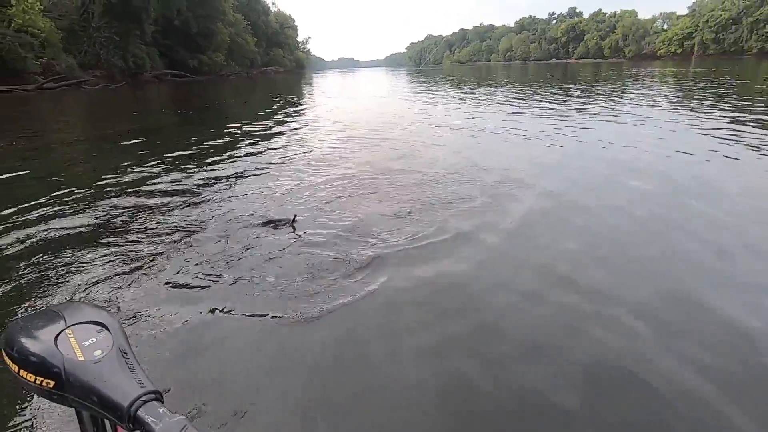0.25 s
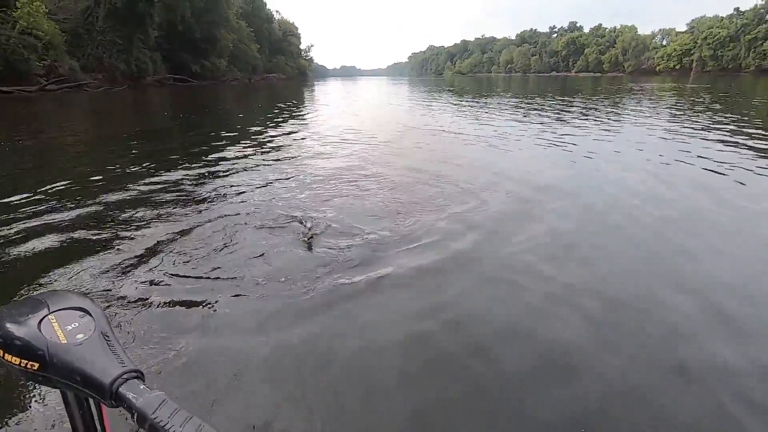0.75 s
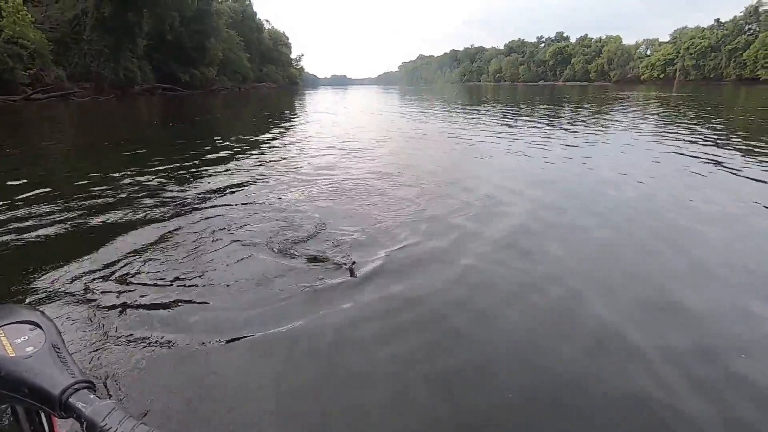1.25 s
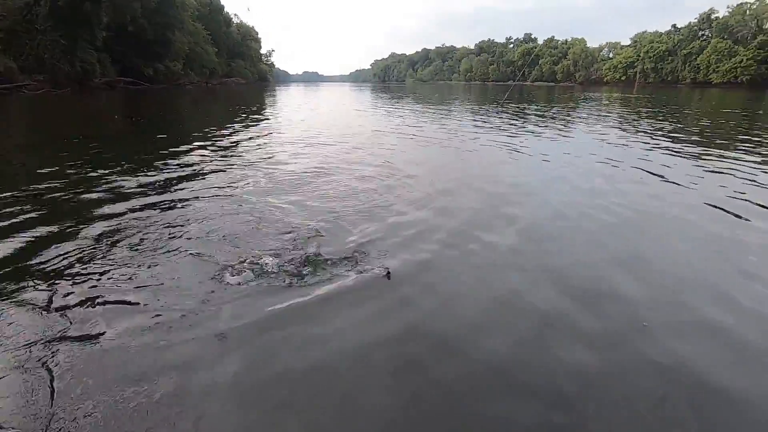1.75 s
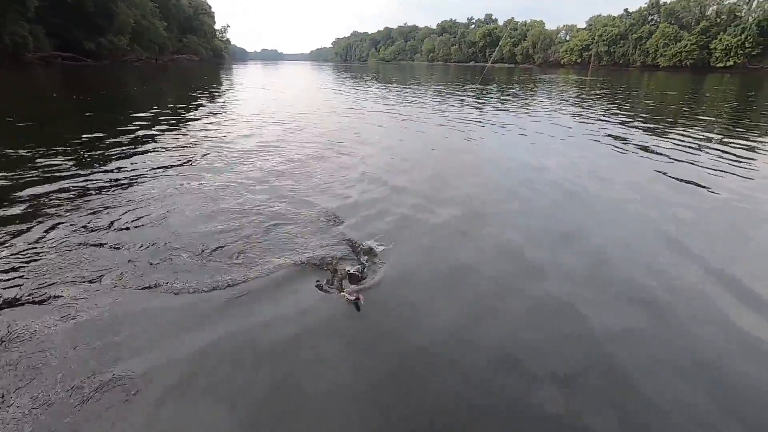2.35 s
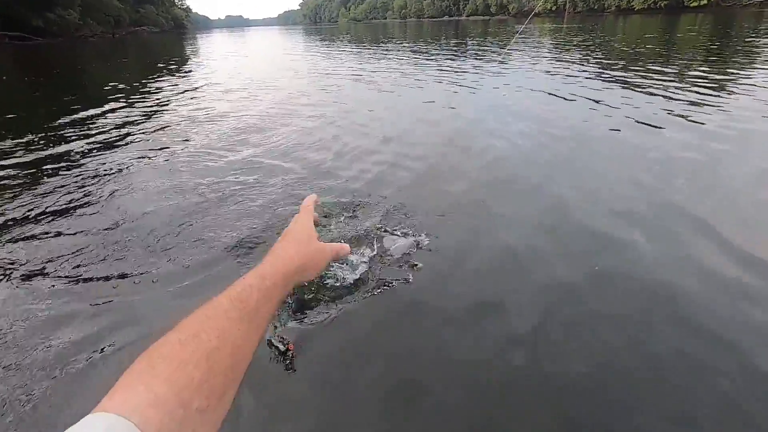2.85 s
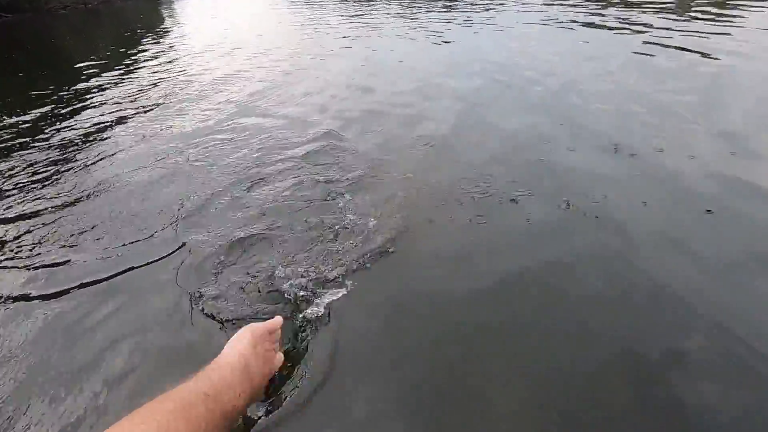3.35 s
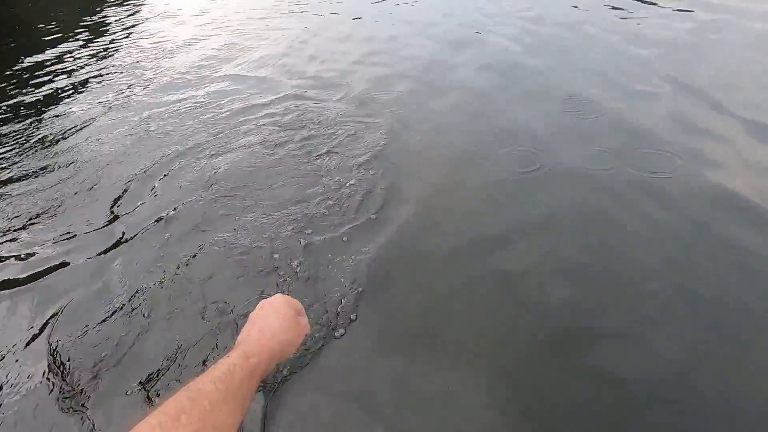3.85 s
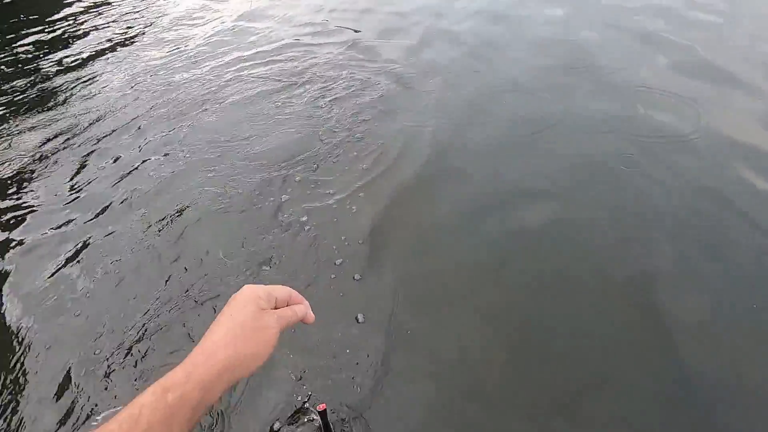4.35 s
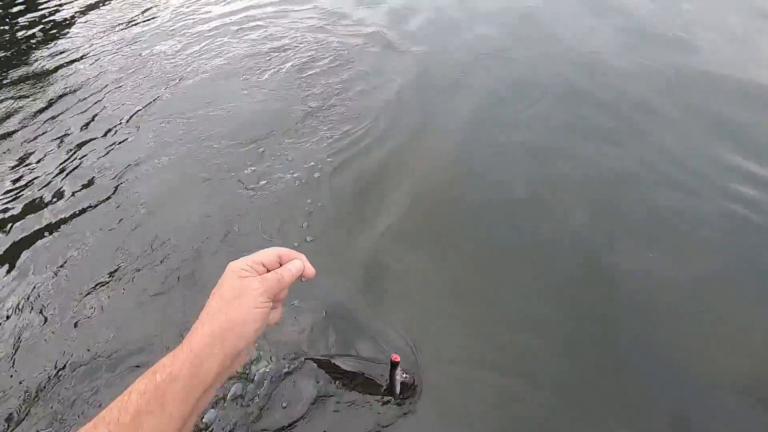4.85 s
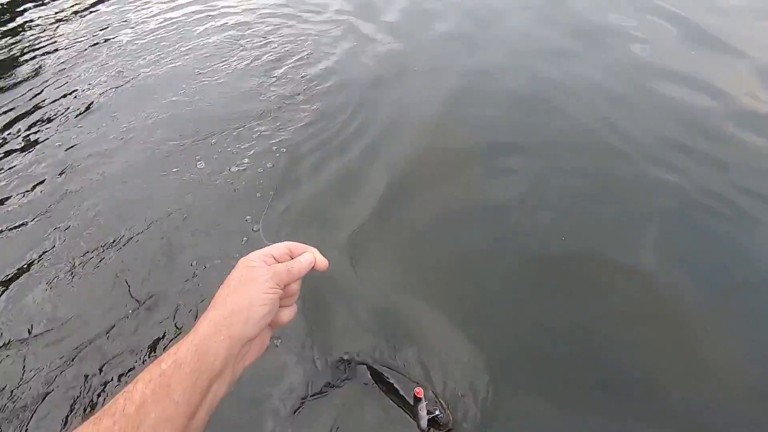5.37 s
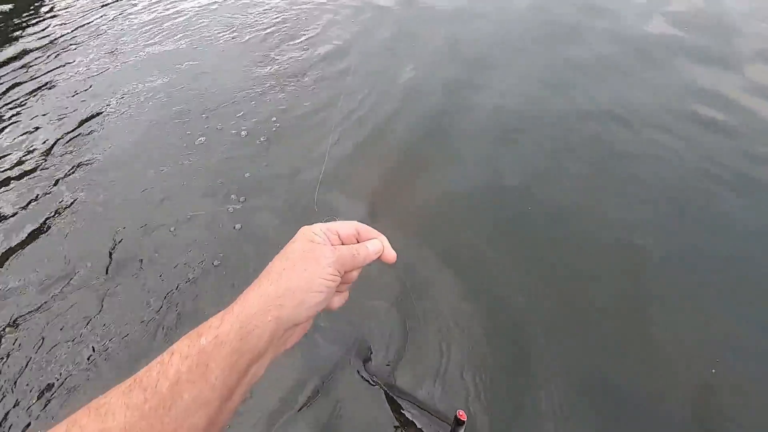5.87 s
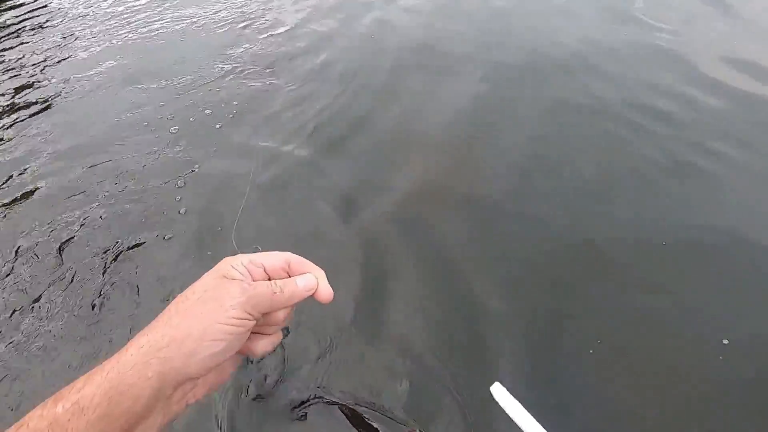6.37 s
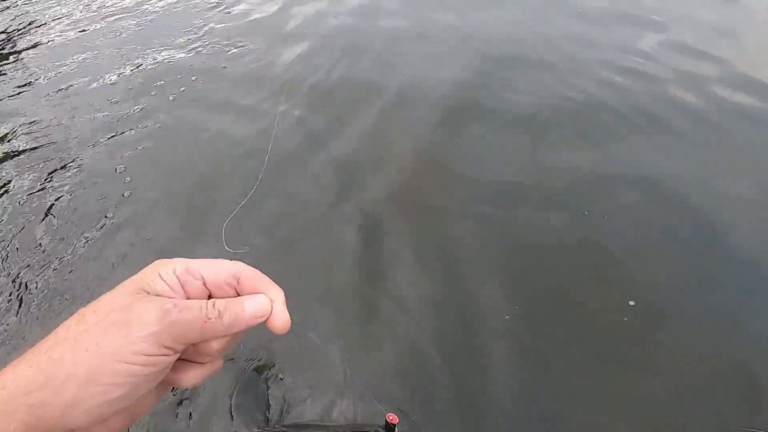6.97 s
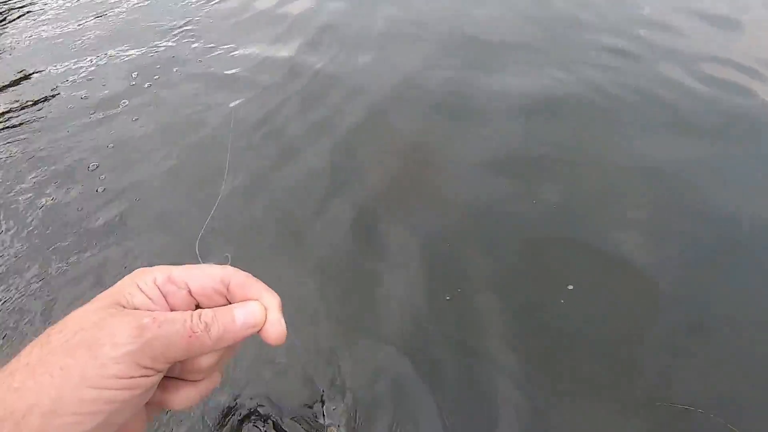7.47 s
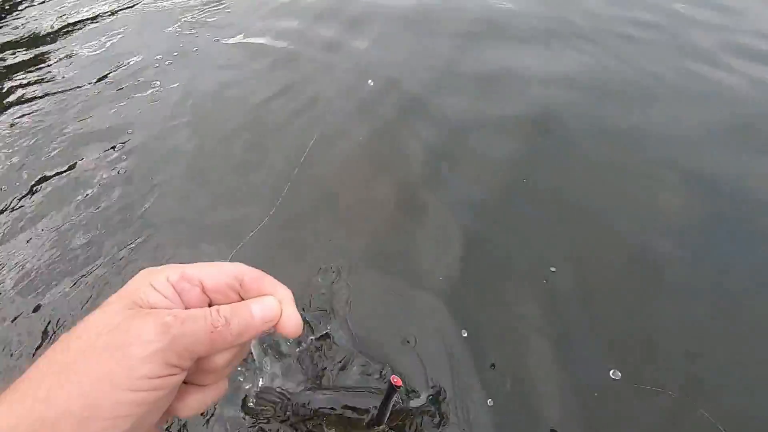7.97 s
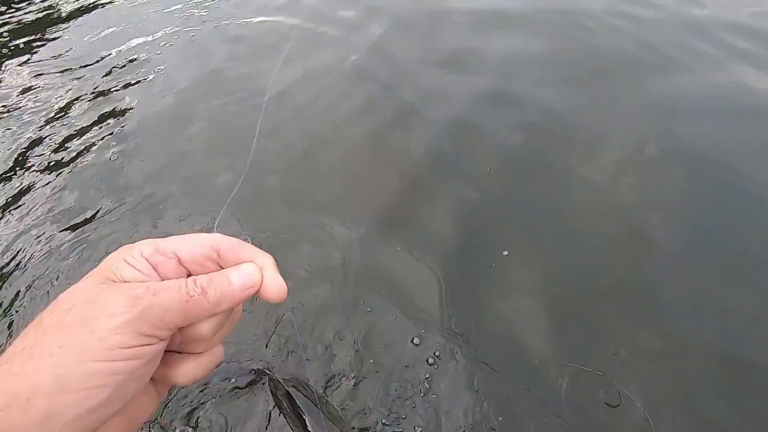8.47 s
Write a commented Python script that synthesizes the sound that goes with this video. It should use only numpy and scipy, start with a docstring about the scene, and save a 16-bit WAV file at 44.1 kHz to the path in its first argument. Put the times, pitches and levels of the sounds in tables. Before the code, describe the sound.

Close to a small boat on a wide open river, a hooked fish splashes in fits: light drips at first, then busy gurgling and slaps, a short sharp flurry, and several hollow knocks on the hull. After a quieter spell with a tiny bird whistle, the hardest thrash cracks out and settles in drips. A dull low machine drone throbs throughout, picked up by a small stereo camera microphone.

```python
"""Far machinery drones over a wide river throughout: steady sines beat inside a dull roar of shaped noise.
From the start a hooked fish thrashes beside a small boat; spray, bubbles and drops are decaying sines
and noise ticks, busy from 2.2 to 3.6 s and again from 4.3 to 4.8 s. From 5.4 s a tool knocks on the hull,
which rings in damped modes; at 6.7 s a bird gives one falling whistle, a gliding sine; from 7.5 s the fish
thrashes hardest, then the water settles. A small camera with two microphone ports listens."""
import sys
import numpy as np
from scipy import signal
from scipy.fft import rfft, irfft, next_fast_len
from scipy.io import wavfile
from scipy.ndimage import uniform_filter1d

SR = 44100
rng = np.random.default_rng(int(sys.argv[2]) if len(sys.argv) > 2 else 0)


def volts_from_decibels(level):
    """Turn decibel levels (scalar or array-like) into linear amplitude factors."""
    exponent = np.asarray(level, float) / 20
    return 10 ** exponent


def generate_wav(sig):
    """Save sig (samples, or channels by samples) to the path in sys.argv[1] as 16-bit PCM at SR."""
    pcm = np.round(np.clip(np.atleast_2d(sig).T, -1, 1) * 32767).astype(np.int16)
    wavfile.write(sys.argv[1], SR, pcm)


N = 384552
T = np.arange(N) / SR

# Steady tones of the far machinery. Each row: frequency in Hz, rms level in dB before the level curves.
MACHINE_TONES = [(29.98, -54.7), (37.26, -34.3), (74.51, -33.7), (79.17, -43.9), (90.09, -30.2),
                 (95.89, -29.3), (114.02, -44.4), (117.1, -46.4), (143.1, -43.6), (149.0, -46.1),
                 (234.23, -50.1), (235.86, -50.2), (260.85, -52.9), (353.82, -53.6), (398.93, -52.2),
                 (468.46, -51.4), (471.76, -58.9), (820, -58.3)]
# Level curve for the 60 to 300 Hz tones, approximating slow beating. Each row: time in seconds, change in dB.
BASS_LEVEL = [(0, 0.5), (3.6, -0.5), (4.2, -5.5), (4.7, 2), (5.2, 1.5), (5.8, -1.5), (6.7, 3), (7.6, -1),
              (8.72, 2)]
# Broad roar under the tones. Each row: frequency in Hz, density in dB per Hz before balance and patches.
ROAR_SPECTRUM = [(20, -59.5), (36, -52), (50, -51), (100, -44), (150, -53.5), (212, -50.5), (300, -62.5),
                 (360, -60), (500, -68.5), (900, -74.5), (1700, -79), (2900, -87.5), (6200, -105),
                 (9100, -111), (16000, -125)]
# The camera turns, changing the upper part of the drone. Each row: time in seconds, change in the roar in dB.
CAMERA_FACING = [(0, 1), (1.5, 1), (2.5, 1.5), (3.8, 1), (4.8, 0), (5.4, 1.5), (5.9, -2.5), (6.6, 0.5),
                 (7.5, -2), (8.72, -0.5)]
# Correlation of the roar at the ports. Each row: frequency in Hz, likeness (1 same, -1 opposed; clipped there).
PORT_LIKENESS = [(60, 0.99), (120, 1), (260, 0.99), (530, 0.82), (1100, -0.12), (2290, 0.44), (4740, -0.29),
                 (9820, -1.1)]
# Balance of the roar. Each row: frequency in Hz, left minus right in dB.
PORT_BALANCE = [(60, 0.5), (140, -0.5), (330, 0), (770, -7), (1800, -8), (4200, -2.5), (9820, 3.5)]
# The bird's whistle. Each row: time in seconds, frequency in Hz, rms level in dB before panning.
BIRD_WHISTLE = [(6.69, 2690, -66), (6.71, 2640, -60), (6.735, 2470, -58), (6.752, 2320, -58),
                (6.77, 2200, -68)]
# Resonant modes of the hull. Each row: frequency in Hz, relative level in dB, 60 dB decay time in seconds.
HULL_MODES = [(103, -3.5, 0.09), (140, -6, 0.089), (167, -4.5, 0.14), (205.4, -4, 0.13), (291, -5, 0.1),
              (394, -6.5, 0.048), (543, -5.5, 0.02), (658, -8.5, 0.033), (845, -10.5, 0.031),
              (960, -12.5, 0.029), (1222, -6, 0.019), (1640, -14, 0.017), (2440, -11.5, 0.016),
              (2870, -19, 0.035), (3640, -14, 0.009), (4970, -22, 0.014), (6000, -20, 0.0072),
              (8140, -36, .01)]
# Blows on the hull. Each row: start in seconds, nominal level in dB, hardness in dB per octave,
# left minus right in dB, peak of the struck spot's snap in dB, snap frequency in Hz.
HULL_BLOWS = [(5.375, -36, 2.5, -15, -53, 800), (5.387, -20, 0.5, -12.5, -17.5, 270),
              (5.398, -36, -5, -7, -32, 480), (5.497, -40, 0, -5, -31, 1100),
              (5.513, -29, -0.5, -3, -19, 340), (5.528, -17.5, 0, -9.5, -29, 1050),
              (5.542, -28.5, -1, -7.5, -23, 420), (5.583, -10, 0.5, -5, -13, 743),
              (5.5924, -5.5, -2, -9, -17.5, 917), (6.004, -33.5, -2.5, -22, -39, 604),
              (6.149, -36.5, 8, -1.5, -32.5, 2700), (6.45, -24, 7, -4.5, -25.5, 1250)]
# The tool drags on the hull around the first blows. Each row: time in seconds, relative slip level in dB.
TOOL_DRAG = [(5.35, -80), (5.37, -37.5), (5.398, -29.5), (5.42, -56), (5.49, -41.5), (5.509, -28.5),
             (5.55, -33), (5.575, -40.5), (5.62, -80.5)]
# Spectra of the water's grains. Each row: frequency in Hz, relative level in dB.
SPRAY_SPECTRUM = [(1500, -19), (3000, -8.5), (5000, -10), (7000, 1.5), (9000, -6), (12000, -2),
                  (16000, -11)]
GURGLE_SPECTRUM = [(1100, -3.5), (1600, -7), (2200, -1.5), (3300, 0), (4200, -2.5), (5500, -5.5)]
SLOSH_SPECTRUM = [(450, -3.5), (700, -1.5), (1200, -1), (1900, -4.5)]
# Calm lapping. Each row: time in seconds, fine spray in dB, gurgle in dB, low slosh in dB.
CALM_WATER = [(0, -68, -60.5, -50), (1.5, -65, -59, -51), (3.9, -66.5, -61, -62), (5.3, -70.5, -64, -53),
              (5.7, -72, -66.5, -56.5), (6.5, -70, -64, -63), (7.0, -74, -69.5, -56.5),
              (7.45, -80, -62.5, -50.5), (8.72, -66.5, -62, -51.5)]
# Bursts of thrashing. Each row: start in seconds, hold in seconds, then spray, gurgle and slosh in dB.
THRASH_BURSTS = [(0.0, 0.015, -58, -67, -48), (0.47, 0.11, -60, -72, -56), (1.22, 0.013, -73.5, -57, -51),
                 (1.55, 0.13, -59, -57, -51), (1.66, 0.066, -53.5, -47, -54), (1.8, 0.052, -57.5, -55, -50),
                 (2.26, 0.19, -53.5, -59, -48), (2.47, 0.051, -47.5, -46.5, -56),
                 (2.631, .13, -50, -46.5, -45.5), (2.803, 0.17, -47, -42.5, -43),
                 (3.06, 0.018, -61, -58, -43), (3.14, 0.071, -51, -45.5, -45), (3.42, 0.18, -53, -50, -57),
                 (4.34, 0.15, -51, -54, -51), (4.5, 0.019, -49.5, -45, -41.5),
                 (4.73, 0.012, -58.5, -65, -55), (7.47, 0.085, -57.5, -58, -54),
                 (7.62, 0.063, -46, -67, -54), (7.7, 0.11, -39, -42.5, -49), (7.88, .17, -45, -51, -44.5),
                 (8.14, 0.033, -47, -53, -52)]
# The tail slaps the surface. Each row: start in seconds, nominal level in dB, left minus right in dB.
TAIL_SLAPS = [(1.659, -32.5, -0.5), (1.762, -31, 0), (1.815, -34, -1), (1.931, -31.5, -3),
              (2.2562, -30.5, -14), (2.5172, -26.5, -1), (2.632, -34.5, -3.5), (2.7447, -28, -17),
              (2.645, -30.5, -3), (2.695, -33, 1), (2.8882, -35, 10), (2.976, -31.5, 0), (3.058, -32.5, -1),
              (3.227, -40, 1), (4.342, -27, 5), (4.4206, -22.5, 1), (4.515, -22.5, -1), (4.538, -29, 1),
              (7.471, -38, -1), (7.587, -33.5, -7), (7.6179, -40, -7), (7.6787, -25, 6), (7.655, -29, 2),
              (7.8005, -9.5, -1), (7.8128, -8.5, -2), (7.854, -31, 0), (7.896, -30, 0.5),
              (7.9267, -22.5, -5.5), (7.948, -25, -3.5), (7.99, -20, 1.5), (8.0227, -26.5, -9.5)]
# The clearest drops. Each row: start in seconds, peak of the ring in dB, frequency in Hz, left minus right in dB.
CLEAR_DROPS = [(0.008, -43.5, 8200, 1), (0.018, -44, 8300, 0), (0.108, -52.5, 7000, 0),
               (0.118, -49, 7100, -1), (0.146, -53, 7200, 1), (0.167, -54, 7000, 0),
               (0.207, -49.5, 5600, 1), (0.227, -59, 7100, 0), (0.324, -53, 9800, 0), (0.427, -49, 9700, 0),
               (0.44, -51, 6400, 0), (0.509, -47, 7200, 1), (0.539, -42.5, 7800, 0), (0.59, -47.5, 8000, 0),
               (0.639, -46, 10500, 0), (0.663, -44, 10800, -1), (0.4725, -43, 6500, 11),
               (0.491, -43, 9800, -8), (.532, -41, 7230, 2.5), (.6226, -44.5, 8020, -4),
               (1.2392, -43, 4600, 2), (1.55, -46, 7000, 1), (1.575, -43, 7000, -1),
               (1.592, -39.5, 6850, -1), (1.603, -38, 6680, 1.5), (1.632, -45.5, 5600, -0.5),
               (1.657, -39, 4400, 0), (1.673, -39.5, 6600, 5), (1.697, -50, 7100, 1), (2.041, -44, 7340, 0),
               (2.0783, -49, 9480, -15), (2.115, -44, 9970, -19), (2.259, -39, 8250, -25.5),
               (2.3503, -42, 7160, -3.5), (2.387, -39, 7050, 16), (2.403, -32, 7000, 3.5),
               (2.445, -35, 7100, 4.5), (2.6322, -42, 7740, -15), (3.116, -45.5, 9520, -8),
               (3.532, -41.5, 8500, -21.5), (4.093, -53, 5510, 3), (4.342, -33, 9300, 1),
               (4.354, -32, 9600, -17), (4.3686, -19, 6430, 2.5), (4.457, -40, 4600, 0),
               (4.663, -45, 4500, 0), (4.389, -29, 9450, -8), (4.3948, -26, 9200, 1),
               (4.421, -31.5, 9100, -10), (4.446, -38.5, 6680, 7), (4.468, -40, 6930, -3),
               (4.511, -34.5, 6360, -5), (4.578, -38.5, 7840, -2), (4.736, -40.5, 7640, -10.5),
               (4.808, -45, 7930, 0), (4.778, -49, 8200, 0), (4.856, -48, 7710, -0.5),
               (4.874, -55, 7700, 0), (4.882, -54, 7700, 0), (4.915, -55, 7700, 0),
               (5.1094, -48.5, 8300, -9), (5.257, -57, 7800, -9), (6.0005, -50, 7600, -9.5),
               (6.098, -56, 5300, 4), (6.2263, -47.5, 5640, -5), (6.405, -51, 5500, -0.5),
               (6.6555, -54, 7930, -9.5), (7.473, -49.5, 8300, -16), (7.512, -41.5, 7700, -9.5),
               (7.519, -40.5, 9600, -5), (7.5768, -37.5, 7840, -6), (7.586, -38, 9300, -9),
               (7.6194, -27, 7500, -5), (7.6407, -37.5, 6750, 15.5), (7.6728, -36.5, 8140, -17),
               (7.6943, -28, 9150, -3), (7.7264, -23, 5940, -1.5), (7.737, -27.5, 4830, 4.5),
               (7.756, -29.5, 7140, -3.5), (7.7603, -32, 4660, -3), (7.8394, -28, 4970, -.5),
               (7.853, -24, 9500, 1), (7.879, -30, 8800, 11), (7.928, -28.5, 7800, 0),
               (8.001, -27, 9300, -0.5), (8.024, -31.5, 8140, -12.5), (8.0636, -30, 9000, 0),
               (8.105, -41, 5250, 7), (8.126, -39, 5170, -11), (8.1527, -35, 9160, -0.5),
               (8.196, -45, 8120, -1), (8.275, -42, 4840, 2), (8.359, -47.5, 7000, -2),
               (8.235, -44, 5800, -11.5)]
# The clearest trapped bubbles. Each row: start in seconds, peak of the ring in dB, frequency in Hz,
# left minus right in dB.
CLEAR_BUBBLES = [(0.34, -45, 3300, 0), (1.2626, -28, 2980, 0), (1.535, -45, 3400, -1),
                 (1.621, -31, 950, -2), (1.66, -33, 1280, 0), (1.68, -37, 3000, 1),
                 (1.687, -38, 2750, -1.5), (1.816, -41, 2230, 2), (1.829, -40, 1930, 1.5),
                 (1.9116, -34.5, 2980, 2.5), (2.256, -34, 546, -8.5), (2.484, -40, 3700, 0),
                 (2.485, -38, 1720, -3), (2.5172, -35, 2060, -1), (2.5394, -35, 2580, 0),
                 (2.5544, -39, 2650, -2), (2.58, -36, 3020, -1.5), (2.6135, -42, 1600, -6),
                 (2.6319, -41.5, 2800, -2), (2.6449, -39, 3240, -1), (2.6694, -37.5, 3100, 0),
                 (2.6952, -34, 3200, 0.5), (2.719, -39.5, 2700, -0.5), (2.7744, -42, 2440, 0.5),
                 (2.789, -38, 3800, 2.5), (2.8344, -41, 2870, 0.5), (2.8494, -33, 2310, 1),
                 (2.8674, -39, 2580, 0), (2.527, -30, 760, -1), (2.6352, -28.5, 612, -11),
                 (2.651, -33, 543, -1.5), (2.7, -32.5, 1200, 2), (2.726, -35, 3470, 0),
                 (2.744, -26, 620, -5), (2.827, -23, 700, -3), (2.8299, -24.5, 1250, 4),
                 (2.835, -23.5, 553, 3), (2.93, -29.5, 2600, -0.5), (2.956, -31, 3200, 0),
                 (2.9754, -40, 2300, 0), (2.995, -36, 2900, -5), (3.011, -33, 2420, -2.5),
                 (3.057, -33.5, 2220, 2), (3.0644, -36, 2900, 0), (3.1378, -34, 2230, 1),
                 (3.1844, -32, 3120, 0.5), (3.1994, -33, 674, -1), (3.227, -37, 2800, -1),
                 (3.2344, -41, 3360, -3), (3.2494, -42, 2600, 0), (3.3044, -37.5, 2740, -1),
                 (3.372, -35, 2880, 0), (3.42, -34.5, 2600, 0), (4.4275, -37, 3340, 0),
                 (4.483, -30, 1260, -2), (4.514, -31.5, 3140, 0), (4.53, -26, 1160, -2),
                 (4.537, -37, 3300, -0.5), (4.5845, -33, 3230, -0.5), (4.6593, -42, 2850, -4),
                 (6.3223, -41, 3100, -6), (7.469, -34.5, 620, -2), (7.587, -32.5, 1080, -5.5),
                 (7.64, -38.5, 1350, -6), (7.6545, -40, 3300, -1.5), (7.68, -31, 3320, 0),
                 (7.6994, -31.5, 2870, 0), (7.6812, -31, 2570, -4), (7.702, -33, 1230, -9),
                 (7.7127, -30.5, 760, -6.5), (7.7131, -26.5, 3390, 1), (7.731, -27, 2890, 0),
                 (7.735, -26, 4130, -0.5), (7.736, -32, 840, -6.5), (7.7654, -28, 4100, 0),
                 (7.781, -30, 1730, -5.5), (7.794, -26, 1270, -9), (7.8044, -31, 1680, -4.5),
                 (7.74, -36, 1510, -6.5), (7.8018, -17, 3500, 1), (7.809, -29, 2800, -2),
                 (7.813, -18, 3330, -2), (7.814, -29, 1240, -7.5), (7.748, -35, 1800, -4),
                 (7.771, -33, 1910, -4), (7.727, -36, 1950, -3), (7.8324, -26, 4390, 3),
                 (7.8294, -35, 1480, -7), (7.8965, -33.5, 3170, -3), (7.9364, -32.5, 5000, -1.5),
                 (7.9184, -29, 1700, -5), (7.991, -29, 3970, -1), (8.0353, -27.5, 1580, -14),
                 (8.012, -36, 1550, -8.5), (8.052, -33, 1560, -10), (8.071, -39, 3700, -0.5),
                 (8.082, -38, 2600, -2.5), (8.18, -41, 2100, -3), (8.125, -34, 3600, -13),
                 (8.1403, -38, 1890, -15.5), (8.1513, -33, 2760, -7), (8.173, -32.5, 3200, -4.5),
                 (8.2245, -33.5, 2620, -4), (8.229, -32, 3250, -1), (8.276, -32, 3060, -4),
                 (8.29, -37.5, 3160, -1), (8.424, -39, 1450, -1), (8.484, -44, 1960, -5),
                 (8.5014, -47, 1480, -2)]
# Rings with their own length and glide: gulps, plips, plops and clear steady drops. Each row: start in
# seconds, peak in dB, starting frequency in Hz, ring in cycles, half the pitch rise as a share (negative
# falls), left minus right in dB.
OTHER_RINGS = [(1.7, -37, 656, 12, 0.55, 0), (1.695, -33, 950, 16, .05, 0), (1.736, -36, 620, 11, .7, 0),
               (1.748, -32.5, 2500, 12, 0.26, 2), (1.932, -36, 950, 9, 0.22, 0),
               (2.519, -28, 1140, 13, .1, 2), (2.524, -35, 620, 14, 0.39, -2),
               (2.562, -31, 750, 7.4, 0.24, -3), (2.886, -28, 2500, 12, 0.37, -1),
               (2.9, -30, 2400, 10, 0.4, 0), (2.917, -29, 602, 7.3, 0.72, 0), (2.926, -35, 1050, 8, .1, 0),
               (2.947, -36, 1380, 24, -0.054, 0), (3.072, -31, 562, 9.5, 1., 0),
               (3.08, -36, 950, 10, .2, 0), (3.088, -33, 1050, 12, .1, 0), (3.076, -35, 1350, 10, .05, 0),
               (3.146, -33, 2500, 13, 0.27, 0), (3.174, -28, 2500, 13, 0.35, 1),
               (3.206, -31, 2100, 11, .5, 0), (3.284, -33.5, 3200, 20, -0.21, 0),
               (3.412, -38, 596, 22, .5, 2), (3.44, -41, 950, 18, 0.51, 0), (4.34, -36, 2900, 10, .5, 0),
               (4.378, -24.5, 4300, 21, -0.25, -1), (4.427, -34, 2520, 10, 0.33, 0),
               (4.476, -40, 640, 18, 0.42, 0), (4.516, -32, 960, 45, 0.38, -2),
               (4.517, -30, 1900, 20, -.12, -12), (4.568, -35, 597, 15, 0.69, 0),
               (4.578, -36, 1100, 11, 0.66, 0), (4.583, -30.5, 728, 37, .01, 1),
               (4.606, -37, 900, 20, .1, 0), (4.66, -37, 686, 20, .06, 0), (4.724, -42, 637, 18, 0.49, 0),
               (4.744, -41, 560, 12, 1.09, 2), (4.748, -32, 1260, 22, 0.27, 1),
               (4.754, -40, 763, 40, 0.43, 2), (6.097, -48, 2700, 30, .01, 0),
               (6.182, -51, 5800, 60, .01, 0), (6.19, -47, 5800, 50, .01, 0),
               (6.202, -53, 6100, 20, .05, 0), (6.2, -45, 3300, 14, -0.19, 0),
               (6.323, -54, 5200, 50, .01, -4), (6.402, -43, 3250, 30, 0.051, 0),
               (6.405, -56, 6800, 50, .01, 0), (7.878, -28.5, 800, 21, -0.062, -6),
               (7.916, -30.5, 2470, 37, -0.022, -6), (7.95, -22, 1400, 23, -0.19, -9),
               (7.994, -34, 810, 28, 0.062, -7), (8.571, -40, 1044, 23, 0.54, 3)]
# Response of the microphone. Each row: frequency in Hz, gain in dB.
MICROPHONE_RESPONSE = [(20, 0), (9300, 0), (10400, -7), (13400, -18.5), (16000, -20)]
# Phase between the ports. Each row: frequency in Hz, lead of the left port in radians.
PORT_LEAD = [(20, 0), (300, 0), (520, -.4), (1400, .5), (2300, .1), (4200, .2), (6500, .8), (8600, 1.3),
             (10000, 2.2)]

DROP_CYCLES, BUBBLE_CYCLES = 33.5, 17.6  # ring lengths; the bubble's holds at 1 kHz
BUBBLE_RISE = 0.07  # half the pitch rise, as a share


def evened(x):
    """Normalization: scales a signal to unit rms."""
    return x / np.sqrt(np.mean(x ** 2) + 1e-20)


def read(points, hz):
    """Interpolation of a spectrum on a logarithmic frequency axis."""
    f, value = np.transpose(points)
    return np.interp(np.log(hz + 1), np.log(f + 1), value)


def sides(lean_db):
    """Level panning: left and right gains that share a level difference equally."""
    return volts_from_decibels(np.array([lean_db / 2, -lean_db / 2]))


def add(mix, s, sound, lean_db):
    """Superposition: adds a sound at its time and side."""
    part = mix[:, round(s * SR):][:, :len(sound)]
    part += sides(lean_db)[:, None] * sound[:part.shape[1]]


def blip(hz, cycles, rise, onset=0.039):
    """Damped resonance: a softly started sine of unit peak falls 40 dB in its cycles while its pitch glides."""
    u = np.arange(int(cycles / hz * SR) + 8) / SR * hz / cycles  # time as a share of the ring
    tone = np.sin(2 * np.pi * cycles * u * (1 + rise * u))  # pitch ends at 1 + 2 * rise
    decay = volts_from_decibels(-40 * u ** (1 + 4 * abs(rise)))  # the stronger the glide, up or down, the longer the level holds
    wave = tone * (1 - np.exp(-u / onset)) * decay
    return wave / abs(wave).max()


def tick(t60, hz, width_hz):
    """Impulsive noise: a two-pole resonance colours a sharply started, exponentially dying crack."""
    t, r = np.arange(round(t60 * SR)) / SR, np.exp(-np.pi * width_hz / SR)
    poles = [1, -2 * r * np.cos(2 * np.pi * hz / SR), r * r]
    band = signal.lfilter([1, 0, -1], poles, rng.standard_normal(len(t)))
    return evened(band) * volts_from_decibels(-60 * t / t60) / 2


def roar(patchy_db=1.):
    """Filtered noise: random short-time spectra whose correlation between ports depends on frequency."""
    frames, hz = N // 512 + 5, np.fft.rfftfreq(2048, 1 / SR)
    a, b, c, d, patches = rng.standard_normal((frames, 1025, 5)).T
    patches = evened(uniform_filter1d(uniform_filter1d(patches, 20, 0), 10, 1))
    facing_db = np.interp(np.arange(frames) * 512 / SR, *np.transpose(CAMERA_FACING))
    upper = hz ** 2 / (hz ** 2 + 240.0 ** 2)  # long waves bend round the camera
    same = np.clip(read(PORT_LIKENESS, hz), -1, 1)[:, None]
    left = a + 1j * b
    right = same * left + np.sqrt(1 - same ** 2) * (c + 1j * d)
    spectra = np.array([left, right])
    spectra *= volts_from_decibels(read(ROAR_SPECTRUM, hz)[:, None] + patchy_db * patches + upper[:, None] * facing_db)
    spectra *= sides(read(PORT_BALANCE, hz))[:, :, None]
    return np.sqrt(SR / 2048) * signal.istft(spectra, nperseg=2048, noverlap=1536)[1][:, :N]


def hum():
    """Beats: close steady tones interfere; the bass ones follow a level curve, those above the camera's turning."""
    in_step_s = 6.4937  # the tones crest together here, which sets their throb
    facing_db, bass_db = (np.interp(T, *np.transpose(curve)) for curve in (CAMERA_FACING, BASS_LEVEL))
    bass, upper = volts_from_decibels(bass_db), volts_from_decibels(-0.5 + 2.8 * facing_db)
    top = upper * volts_from_decibels(-np.maximum(T - 3.6, 0))  # the highest tone dies away at 1 dB per second
    out = np.zeros(N)
    for hz, db in MACHINE_TONES:
        level = top if hz > 600 else upper if hz > 300 else bass if hz > 60 else 1
        out += np.sqrt(2) * volts_from_decibels(db) * level * np.cos(2 * np.pi * hz * (T - in_step_s))
    return out


def bird():
    """Frequency modulation: the integral of a falling pitch is the phase of one far-off whistle."""
    s, hz, db = np.transpose(BIRD_WHISTLE)
    t, out = np.arange(s[0], s[-1], 1 / SR), np.zeros((2, N))
    phase = 2 * np.pi * np.cumsum(np.interp(t, s, hz)) / SR
    whistle = np.sin(phase) * np.sqrt(2) * volts_from_decibels(np.interp(t, s, db))
    add(out, s[0], whistle, lean_db=-25.0)
    return out


def knocks():
    """Modal excitation: blows and a short drag ring the hull; low modes swell slowly and stay near the centre."""
    t, out = np.arange(SR // 4) / SR, np.zeros((2, N))
    swell_cycles = 0.74  # the struck spot snaps first, the wide panels follow
    rings = [volts_from_decibels(db - 60 * t / t60) * np.sin(2 * np.pi * hz * t) * (1 - np.exp(-t * hz / swell_cycles))
             for hz, db, t60 in HULL_MODES]
    for s, db, bright_db, lean_db, snap_db, snap_hz in HULL_BLOWS:
        snap = -volts_from_decibels(snap_db) * blip(snap_hz, cycles=7.4, rise=0.024, onset=0.086)
        add(out, s, snap, lean_db * min(snap_hz / 600, 1))
        spots = rng.standard_normal(len(HULL_MODES))  # dB, each blow excites the modes unevenly
        for k, ((hz, _, _), ring, spot) in enumerate(zip(HULL_MODES, rings, spots)):
            hardness_db = bright_db * np.log(hz / 800) / np.log(2)  # a hard blow reaches the high modes
            sign = 1 if hz < 350 else (-1) ** k
            add(out, s, volts_from_decibels(db - 6.0 + hardness_db + spot) * sign * ring, lean_db * min(hz / 600, 1))
        body = tick(t60=0.15 / (2.0 + abs(bright_db) / 3), hz=1930.0 * 2 ** (bright_db / 7), width_hz=640.0)
        add(out, s, volts_from_decibels(db + bright_db - 13.0) * body, lean_db)
        add(out, s, volts_from_decibels(db + 1.75 * bright_db - 16.0) * tick(t60=0.02, hz=8460.0, width_hz=2800.0), lean_db)
        add(out, s, volts_from_decibels(db + 1.2 * bright_db - 15.0) * tick(t60=0.012, hz=12500.0, width_hz=4200.0), lean_db)
    s, db = np.transpose(TOOL_DRAG)
    slips = rng.standard_normal(N) * (rng.random(N) < 2500 / SR) * volts_from_decibels(np.interp(T, s, db))
    soft = uniform_filter1d(slips, 22)  # a dragging edge pushes softly, so mostly the low modes answer
    drag = signal.oaconvolve(soft, sum(rings))[:N] + 0.38 * slips
    return out + sides(-2.0)[:, None] * drag


def grains(colour, cycles, rise, per_s, spread_db, width, count=24):
    """Granular superposition: small blips of uneven strength at random moments, scattered between the ports."""
    out = np.zeros((2, N))
    for hz in np.geomspace(colour[0][0], colour[-1][0], count):
        at = np.flatnonzero(rng.random(N - 8) < per_s / count / SR) + 4
        chance, place = rng.random((len(at), 2)).T
        size = volts_from_decibels(-spread_db * np.log(chance + 0.011))
        place, train = 2 * place - 1, np.zeros((2, N))
        train[0, at] = size * (1 + width * place)
        late = np.rint(3 * place).astype(int)  # samples: the nearer port hears it first
        train[1, at + late] = size * (1 - width * place)
        out += volts_from_decibels(read(colour, hz)) * signal.oaconvolve(train, blip(hz, cycles, rise)[None], axes=1)[:, :N]
    return evened(out)


def stir():
    """Addition of powers: calm lapping, settling bursts and water thrown by slaps, then broken into clumps."""
    t = T[::64]
    s, *columns = np.transpose(CALM_WATER)
    power = np.array([volts_from_decibels(np.interp(t, s, c)) ** 2 for c in columns])
    for start, held, *db in THRASH_BURSTS:
        rise = np.clip((t - start) / 0.01 + 1, 0, 1)  # within 10 ms
        settle = volts_from_decibels(-65 * np.maximum(t - start - held, 0))  # 65 dB per second
        power += (volts_from_decibels(db)[:, None] * rise * settle) ** 2
    for s, db, _ in TAIL_SLAPS:
        thrown_db = np.array([[-25.5], [-22.5], [-47]]) + 0.81 * db  # spray, gurgle, slosh
        thrown_db = thrown_db - 60 * np.maximum(t - s, 0) / 0.099  # falls 60 dB in 0.099 s
        power += (t >= s) * volts_from_decibels(thrown_db) ** 2
    clump_steps = max(round(.006 * SR / 64), 1)  # 6 ms
    clumps = evened(uniform_filter1d(rng.standard_normal((len(t), 3)).T, clump_steps))
    clumps = evened(clumps + 0.3 * clumps.sum(0))  # a clump partly lifts all three layers together
    return [np.interp(T, t, row) for row in np.sqrt(power) * volts_from_decibels(2.5 * clumps)]


def churn():
    """Amplitude modulation: the fish's effort shapes bright spray, gurgling bubbles and low slosh."""
    spray_gain, gurgle_gain, slosh_gain = stir()
    spray = 0.6 * grains(SPRAY_SPECTRUM, cycles=11.0, rise=0.12, per_s=1700.0, spread_db=4.0, width=0.48)
    fizz = grains(SPRAY_SPECTRUM, cycles=12.0, rise=0.12, per_s=20000.0, spread_db=2.5, width=.6, count=16)
    small_drops = grains(SPRAY_SPECTRUM[2:6], cycles=DROP_CYCLES, rise=0.025, per_s=83.0, spread_db=1.5,
                         width=.6, count=8)
    spray += 0.52 * fizz + 0.3 * small_drops
    gurgle = 0.75 * grains(GURGLE_SPECTRUM, cycles=9.4, rise=0.21, per_s=1200., spread_db=3.5,
                           width=0.23, count=16)
    short_blips = grains(GURGLE_SPECTRUM, cycles=4., rise=0.073, per_s=7300.0, spread_db=-3.0,
                         width=0.32, count=12)
    small_bubbles = grains(GURGLE_SPECTRUM, cycles=18., rise=BUBBLE_RISE, per_s=260.0, spread_db=0.5,
                           width=0.4, count=10)
    gurgle += 0.28 * short_blips + 0.56 * small_bubbles
    slosh = 0.84 * grains(SLOSH_SPECTRUM, cycles=6.7, rise=0.19, per_s=600., spread_db=1.5,
                          width=0.94, count=12)
    rising_plops = grains(SLOSH_SPECTRUM[1:], cycles=14., rise=0.27, per_s=90., spread_db=1.0,
                          width=0.5, count=8)
    slosh += 0.46 * rising_plops
    water = gurgle_gain * gurgle + slosh_gain * slosh
    return sides(-2)[:, None] * spray_gain * spray + sides(0.5)[:, None] * water


def splashes():
    """Impact and resonance: drops tick and ring, bubbles smack and ring, other rings glide or hold, slaps crack."""
    out = np.zeros((2, N))
    for s, db, hz, lean_db in CLEAR_DROPS:
        add(out, s, volts_from_decibels(db) * blip(hz, DROP_CYCLES, rise=0.03), lean_db)
        add(out, s, volts_from_decibels(db + 0.5) * tick(t60=0.022, hz=hz, width_hz=2100.0), lean_db / 2)
        add(out, s, volts_from_decibels(db + 7.0) * tick(t60=0.006, hz=13000., width_hz=4000.), lean_db)
    for s, db, hz, lean_db in CLEAR_BUBBLES:
        cycles = BUBBLE_CYCLES * (hz / 1000) ** 0.13  # small bubbles ring a few more cycles
        add(out, s, volts_from_decibels(db) * blip(hz, cycles, BUBBLE_RISE), lean_db)
        add(out, s, volts_from_decibels(db - 8.0) * tick(t60=0.025, hz=1.3 * hz, width_hz=800.0), lean_db)
    for s, db, hz, cycles, rise, lean_db in OTHER_RINGS:
        add(out, s, volts_from_decibels(db) * blip(hz, cycles, rise), lean_db)
    for s, db, lean_db in TAIL_SLAPS:
        add(out, s, volts_from_decibels(db - 7.0) * tick(t60=0.024, hz=4000., width_hz=13000.0), lean_db)
        add(out, s, volts_from_decibels(db - 12.5) * tick(t60=0.008, hz=13000., width_hz=4500.), lean_db)
    return out


def nearby(x, t60=.05, level_db=-12):
    """Scattering: hull side and water surface give each sound a short tail, different at each port."""
    t = np.arange(round(t60 * SR)) / SR
    tail = rng.standard_normal((2, len(t))) * volts_from_decibels(-60 * t / t60)
    tail /= np.linalg.norm(tail[0])
    return x + volts_from_decibels(level_db) * signal.oaconvolve(x, tail, axes=1)[:, :N]


def scene():
    """Superposition of the distant drone, roar and bird with the scattered water and knocks close by."""
    return hum() + roar() + bird() + nearby(churn() + splashes() + knocks())


def band_limit(x):
    """A steep low-pass at the top of the band."""
    return signal.sosfilt(signal.butter(12, 15830, fs=SR, output="sos"), x)


def record(dry):
    """Linear filtering: the microphone loses the top of the treble and its ports differ in phase."""
    size = next_fast_len(N + 8192)
    padded = np.pad(dry, ((0, 0), (4096, size - N - 4096)), "reflect")
    hz = np.fft.rfftfreq(size, 1 / SR)
    port_phase = np.exp(.5j * np.outer([1, -1], read(PORT_LEAD, hz)))
    response = volts_from_decibels(read(MICROPHONE_RESPONSE, hz)) * port_phase
    heard = irfft(rfft(padded, size) * response, size)[:, 4096:N + 4096]
    fade = np.sin(np.pi / 2 * np.minimum((N - np.arange(N)) / 150, 1)) ** 2  # ends without a click
    return band_limit(heard * fade)


dry = scene()
out = record(dry)
generate_wav(out)
```